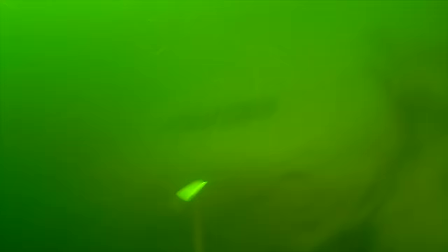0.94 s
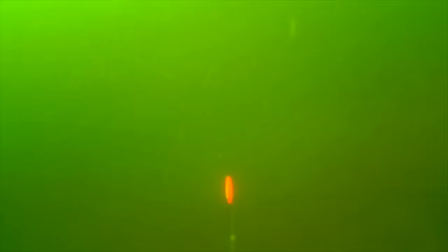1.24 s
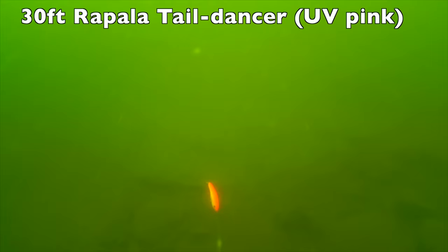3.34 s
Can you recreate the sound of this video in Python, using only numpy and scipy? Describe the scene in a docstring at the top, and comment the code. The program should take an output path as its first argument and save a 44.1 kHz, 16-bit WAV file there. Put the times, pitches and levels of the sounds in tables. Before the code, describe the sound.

A rough, swelling hum and ratcheting chatter stop suddenly, leaving soft underwater hiss, small whistling swishes and a sharp knock.

```python
"""Towed underwater camera housing

Heard from inside, on a taut line behind a fishing lure. Shed eddies make the line hum and shudder ever
harder while ratchet ticks run down it and the rig chatters; all this cuts off abruptly. Then the line sings
faintly with each swing of the rig, over hiss, a thin whine, scrapes and bumps. A sharp knock hits the case."""
import sys
import numpy as np
from scipy import signal
from scipy.fft import rfft, irfft, next_fast_len
from scipy.io import wavfile

SR = 44100
rng = np.random.default_rng(int(sys.argv[2]) if len(sys.argv) > 2 else 0)


def pcm_store(signal):
    """Save signal as 16-bit PCM."""
    levels = np.round(np.clip(np.atleast_2d(signal), -1, 1) * 32767)
    wavfile.write(sys.argv[1], SR, levels.astype(np.int16).T)


N = 306495
TIME = np.arange(N) / SR
STOP_S = 1.3165  # abrupt cut: hum, ticks and chatter break off


def amp(db):
    """dB to gain."""
    return 10 ** (np.asarray(db) / 20)


def unit(x):
    """Scale to rms 1."""
    return x / np.sqrt(np.mean(x ** 2) + 1e-20)


def add(mix, start_s, sound):
    """Mix a sound in at start_s."""
    start = round(start_s * SR)
    sound = sound[max(-start, 0):]
    part = mix[max(start, 0):][:len(sound)]
    part += sound[:len(part)]


def colour_db(colour, hz):
    """Level at hz of a spectrum of (f/Hz, level/dB) points."""
    points_hz, db = np.transpose(colour)
    return np.interp(np.log(hz + 1), np.log(points_hz), db)


def tint(x, colour):
    """Zero-phase filter with the given spectrum."""
    size = next_fast_len(len(x))
    gain = amp(colour_db(colour, np.fft.rfftfreq(size, 1 / SR)))
    return irfft(rfft(x, size) * gain, size)[:len(x)]


def ringing(colour, size):
    """Minimum-phase impulse response of a body with the given spectrum."""
    gain = amp(colour_db(colour, np.fft.rfftfreq(size, 1 / SR)))
    cepstrum = irfft(np.log(gain))
    cepstrum[1:size // 2] *= 2
    cepstrum[size // 2 + 1:] = 0
    return irfft(np.exp(rfft(cepstrum)))


def wander(t, rate_hz):
    """Random curve of rms 1, up to about rate_hz."""
    steps = rng.standard_normal(4096)
    return unit(np.interp(2 * rate_hz * t, np.arange(len(steps)), steps))


def water_wash(level_db):
    """Steady rush and hiss of the water."""
    # noise spectrum: f/Hz, relative level/dB
    colour = [(12, -43), (20, -16), (33, -6.5), (45, -15), (65, -15), (120, -18.5), (240, -19.5),
              (330, -24), (480, -26.5), (900, -24.5), (1200, -31), (1900, -31), (3400, -34), (15500, -37.5)]
    return amp(level_db) * unit(tint(rng.standard_normal(N), colour))


def line_whine(hz, width_hz):
    """Thin fading tone of the line; amplitude and phase waver."""
    # envelope: t/s, level/dB
    fade = [(0, -71), (1.3, -75), (1.9, -78), (2.3, -82), (6.95, -102)]
    level_db = np.interp(TIME, *np.transpose(fade), right=-120)
    offset_hz = np.fft.fftfreq(N, 1 / SR)
    waver = np.fft.ifft(np.exp(2j * np.pi * rng.random(N)) / (1 + (offset_hz / width_hz) ** 2))
    return amp(level_db) * unit((waver * np.exp(2j * np.pi * hz * TIME)).real)


def line_scrapes():
    """Faint patches of bright friction noise."""
    # scrapes: centre t/s, level/dB, length/s
    patches = [(1.557, -66, 0.033), (1.703, -67, 0.035), (2.046, -62.5, 0.047), (2.24, -63.5, 0.045),
               (2.851, -69, 0.47), (4.079, -66.5, 0.11), (4.251, -58, 0.04), (4.445, -71.5, 0.23),
               (5.581, -69.5, 0.094), (5.995, -66.5, 0.045), (6.215, -62, 0.032)]
    # friction spectrum: f/Hz, relative level/dB
    colour = [(2000, -46), (3500, 9), (4300, -7), (5200, 13.5), (6500, -25), (7800, 13.5), (8800, -13),
              (14000, -1.5)]
    out = np.zeros(N)
    for s, db, length_s in patches:
        size = int(length_s * SR)
        friction = unit(tint(rng.standard_normal(size), colour))
        add(out, s - length_s / 2, amp(db) * signal.windows.tukey(size) * friction)
    return out


def water_bumps(hz, decay_s):
    """Soft low pushes of the water, two or three cycles each."""
    # bumps: t/s, level/dB
    pushes = [(3.727, -45), (3.955, -47.5), (3.986, -50), (4.26, -52), (5.137, -50), (5.434, -43.5),
              (5.466, -44), (5.574, -52.5)]
    out, t = np.zeros(N), np.arange(4096) / SR
    bump = t / decay_s * np.exp(1 - t / decay_s) * np.sin(2 * np.pi * hz * t)
    for s, db in pushes:
        add(out, s, amp(db) * bump)
    return out


def eddy_tones(curves, tones, colour, hard_db, jitter, drift, flicker_db, roughness, stagger_s):
    """Eddies drive tones that glide with the flow; turbulence grows as the level nears hard_db."""
    out, sounding = np.zeros(N), curves[0] > -90
    t = TIME[sounding]
    level_db, hz, lift_db = (curve[sounding] for curve in curves)
    effort_db = np.clip(level_db - hard_db, -12, 3)
    song, power = 0, 0
    # each stretch of line meets its own eddies, so the tones swell and stray separately
    for ratio, db, growth in tones:
        treble_db = lift_db * np.clip(np.log2(ratio), 0, 1)
        tone_db = db + growth * effort_db + treble_db + flicker_db * wander(t, 20)
        strength = amp(tone_db + colour_db(colour, ratio * hz))
        stray = 1 + jitter * wander(t, 120) + drift * wander(t, 20)
        grain = 1 + .35 * wander(t, 90)
        local_s = t + stagger_s * wander(t, 6)  # a swing arrives early or late
        local_db, local_hz = np.interp(local_s, t, level_db), np.interp(local_s, t, hz)
        phase = 2 * np.pi * np.cumsum(ratio * local_hz * stray) / SR
        song += strength * grain * amp(local_db - level_db) * np.cos(phase)
        power += strength ** 2 / 2
    turbulence = roughness * amp(effort_db / 2) * unit(tint(rng.standard_normal(N), colour))[sounding]
    out[sounding] = amp(level_db) * (song / np.sqrt(power) + turbulence)
    return out


def rig_swings(faint_gap_s, faint_db):
    """Clear swings, with faint ones in the pauses: (t/s, level/dB, treble lift/dB)."""
    # clear swings: t/s, level/dB, treble lift/dB
    clear = [(1.49, -60, -2.5), (1.745, -60, -6), (2.03, -61, -6), (2.37, -57.5, -10), (2.482, -57, 3.5),
             (2.572, -44, 2), (2.65, -45.5, -11), (2.708, -41.5, -5), (2.765, -42, -4), (2.816, -42.5, -8),
             (2.864, -47, -6.5), (2.935, -46.5, -1), (3.049, -55, 0), (3.122, -47, -3), (3.197, -51, -3.5),
             (3.282, -47.5, -5.5), (3.384, -52, -8), (3.479, -45, -2), (3.553, -45, -3.5), (3.648, -56, -3),
             (3.729, -46.5, -4), (3.815, -52.5, -4), (3.93, -53.5, 3), (4.028, -50, -2.5), (4.13, -55, 4),
             (4.229, -52, -2.5), (4.349, -53, -1.5), (4.463, -54.5, 4), (4.568, -55.5, 1.5),
             (4.649, -53.5, -6), (4.779, -61.5, 8), (4.877, -55.5, 2), (4.979, -56, -2), (5.343, -59, 13.5),
             (5.39, -65, 9), (5.438, -54.5, 3.5), (5.49, -62.5, 9), (5.679, -61.5, 10),
             (5.806, -59.5, -3.5), (5.905, -55.5, -7.5), (6.037, -58, 9.5), (6.142, -60, -6),
             (6.363, -59.5, -8), (6.622, -58, -5.5), (6.747, -59.5, -6.5), (6.871, -59, -8.5)]
    clear_s = np.array([row[0] for row in clear])
    late, size, lift = rng.standard_normal((64, 3)).T
    faint_s = STOP_S + faint_gap_s * (np.arange(len(late)) + .5 + .15 * late)
    faint = [(s, db, lift_db) for s, db, lift_db in zip(faint_s, faint_db + 1.8 * size, 5 * lift)
             if abs(clear_s - s).min() > .7 * faint_gap_s and s < TIME[-1]]
    return clear + faint


def swing_flow(swings, width_s, bend, stretch):
    """Flow rises and falls with each swing. Curves of level/dB, pitch/Hz, treble lift/dB."""
    tow_hz, firm_rise_hz, firm_db, lift_hz_per_db = 773, 202.6, -46, -6
    power, weight, pitch, lift = np.full((4, N), 1e-14)
    top_db = max(row[1] for row in swings)
    t = np.arange(-6000, 6000) / SR
    for s, db, lift_db in swings:
        # harder swing: faster flow, higher and shorter whistle
        peak_hz = tow_hz + firm_rise_hz * amp(db - firm_db) ** .58 + lift_hz_per_db * lift_db
        sigma_s = width_s * amp(stretch * (top_db - db))
        swell = np.exp(-(t / sigma_s) ** 2 / 2)
        add(power, s + t[0], (amp(db) * swell) ** 2)
        add(weight, s + t[0], swell ** 2)
        add(pitch, s + t[0], swell ** 2 * peak_hz * (1 - bend * (1 - swell)))
        add(lift, s + t[0], swell ** 2 * lift_db)
    return 10 * np.log10(power), pitch / weight, lift / weight


def line_whistles():
    """At towing speed the line gives one small arched whistle per swing."""
    # eddy tones: pitch ratio, relative level/dB, growth/(dB per dB of effort)
    tones = [(.29, -8.5, -0.99), (.51, -8, 0.19), (.62, 0, 0.72), (.79, -9, -0.61), (1.021, -0.5, -0.073),
             (1.37, -6.5, 0.33), (1.68, -7.5, 0.66), (1.97, -3.5, 0.0057), (2.52, -5.5, 0.76),
             (2.929, -10.5, 0.45), (3.3, -10.5, 0.29)]
    # housing response: f/Hz, gain/dB
    housing = [(200, -22.5), (370, -18.5), (480, 3.5), (560, -5), (650, 2.5), (800, -10), (960, 5),
               (1150, -4), (1330, -6.5), (1480, 2), (1640, 6), (1850, -4.5), (2020, 3), (2250, -12.5),
               (2480, 3), (2850, -11), (3200, -5), (3550, -5.5), (3900, -15), (9000, -27)]
    swings = rig_swings(faint_gap_s=.115, faint_db=-66)
    curves = swing_flow(swings, width_s=.0122, bend=.22, stretch=.17)
    return eddy_tones(curves, tones, housing, hard_db=-46, jitter=.015, drift=.022,
                      flicker_db=3.5, roughness=.28, stagger_s=.00401)


def case_knocks(rise_s, strike_db, rebound_s, rebound_db):
    """The struck case rings, quickly damped by the water; a weak rebound follows."""
    # one sharp knock, one faint: t/s, relative level/dB
    strikes = [(5.5197, -14.5), (5.9517, -39.5)]
    # case modes: f/Hz, relative level/dB, t60/s
    modes = [(960, -31.5, 0.029), (1585, -12.5, 0.0098), (2070, 2.5, 0.0031), (3070, 2.5, 0.0042),
             (3460, -3.5, 0.0069), (4270, -15, 0.0062), (5070, 2.5, 0.0019), (6100, -16, 0.0055),
             (7920, -6, 0.0051)]
    out, t = np.zeros(N), np.arange(2048) / SR
    ring = sum((-1) ** k * amp(db - 60 * t / t60_s) * np.sin(2 * np.pi * hz * t)
               for k, (hz, db, t60_s) in enumerate(modes))
    ring *= 1 - np.exp(-(t / rise_s) ** 2)
    ring /= abs(ring).max()
    for s, db in strikes:
        add(out, s, amp(db + strike_db) * ring)
        add(out, s + rebound_s, amp(db + rebound_db) * ring)
    return out


def line_hum(shudder_hz, crest_s, throb_db, throb_bend, bend_lag_s):
    """The hard-pulled line hums low and rough; its shudder swings the hum's level and pitch."""
    # hum under pull: t/s, level/dB, pitch/Hz, treble lift/dB
    pull = [(0, -58.5, 400, -10), (.2, -54.5, 210.8, 12), (.235, -42.5, 214.6, -4), (.27, -45, 219.5, -3),
            (.345, -41.5, 270.6, 0), (.39, -52.5, 209.9, 2), (.48, -39.5, 244.8, 1), (.57, -33.5, 335.9, 1),
            (.63, -38.5, 305.6, 3), (.71, -31, 349.7, 7), (.82, -41, 280.8, 10), (.9, -37.5, 315.8, 0),
            (1.02, -30.5, 364.7, 1), (1.17, -30, 390, -4.5), (1.27, -32.5, 381.8, 2.5),
            (1.32, -36.5, 352.5, -15.5)]
    # eddy tones: pitch ratio, relative level/dB, growth/(dB per dB of effort)
    tones = [(1, 1, 0), (1.45, -11, 2), (1.97, 0.5, 0.84), (2.65, -8, -0.05), (3.7, -10, 0),
             (4.3, -8.5, 0.7), (5.2, -10, 0)]
    # housing response: f/Hz, gain/dB
    housing = [(100, -14), (220, -4), (380, -3), (560, -4), (800, 1), (1050, -2), (1230, -7), (1550, 4.5),
               (1950, -0.5), (2400, -6), (3300, -11.5), (4200, -26), (9000, -39.5)]
    full_pull_db, shudder_db, shudder_growth = -30.5, -42, 1.2
    times_s, *columns = np.transpose(pull)
    pull_db, hz, lift_db = (np.interp(TIME, times_s, column) for column in columns)
    throb = np.cos(2 * np.pi * shudder_hz * (TIME - crest_s))
    late_throb = np.cos(2 * np.pi * shudder_hz * (TIME - crest_s - bend_lag_s))
    curves = pull_db + throb_db * throb, hz * (1 + throb_bend * late_throb), lift_db
    hum = eddy_tones(curves, tones, housing, hard_db=-33, jitter=.02, drift=.015,
                     flicker_db=2.5, roughness=.55, stagger_s=.001)
    shudder = amp(shudder_db + shudder_growth * (pull_db - full_pull_db)) * throb
    return hum + shudder


def tick_runs(gap_spread, spread_db):
    """Quick runs of ratchet ticks at a roughly even pace. Yields (t/s, level/dB) per tick."""
    # buzzing runs: start/s, length/s, relative level/dB, typical gap/s
    runs = [(0.048, 0.096, -46, 0.0089), (.594, 0.31, -40, .0095), (0.9737, .34, -38, .0125)]
    for start_s, length_s, db, gap_s in runs:
        s = start_s
        for gap, size in rng.standard_normal((64, 2)):
            if s < start_s + length_s:
                yield s, db + spread_db * size
            s += gap_s * np.exp(gap_spread * gap)


def line_ticks(delay_1khz_s, ring_s, ring_db):
    """High bending waves travel faster, so each tick arrives as a falling chirp and rings the housing."""
    # clear ticks: t/s, relative level/dB
    clear = [(0.0123, -44), (0.0357, -43.5), (0.1536, -42.5), (0.1696, -42.5), (0.1878, -43.5),
             (0.2527, -40.5), (.2742, -40), (.318, -38), (0.3417, -37.5), (0.3755, -37.5), (.3843, -41),
             (.396, -38.5), (0.4085, -36.5), (.418, -38.5), (0.4329, -38), (.4574, -41), (.5031, -36),
             (.527, -37), (0.5609, -35), (.942, -39)]
    # housing response: f/Hz, gain/dB
    housing = [(700, -10), (1600, -7), (2100, -9.5), (2430, -22.5), (2750, 2), (3700, -0.5), (4150, -18),
               (4550, -4.5), (5100, -12.5), (5700, -6.5), (6500, -17), (7800, -5), (8600, -21.5),
               (9400, -14), (11200, -22), (12400, -24), (14000, -34.5)]
    out, t = np.zeros(N), np.arange(1024) / SR
    hz = np.fft.rfftfreq(len(t), 1 / SR)
    delay_s = delay_1khz_s * np.sqrt(1000 / np.maximum(hz, 400))
    dispersion = np.exp(-2j * np.pi * np.cumsum(delay_s) * hz[1])
    response = dispersion * rfft(ringing(housing, len(t)))
    impulse = unit(signal.unit_impulse(len(t)))
    for s, db in clear + list(tick_runs(gap_spread=.22, spread_db=2)):
        ring = unit(rng.standard_normal(len(t)) * np.exp(-t / ring_s))
        tick = irfft(rfft(impulse + amp(ring_db) * ring) * response)
        add(out, s - delay_s[-1], amp(db) * tick / np.linalg.norm(tick))
    return out


def rig_blows(light_count, within_s, light_db, spread_db):
    """Each hard blow comes amid lighter ones. Yields (t/s, level/dB) per blow."""
    # hard blows: t/s, relative level/dB
    hard = [(.6925, -16.5), (.699, -15.5), (.748, -15.5), (.843, -20), (.903, -25.5), (.919, -13),
            (1.083, -16.5), (1.1936, -18.5), (1.2198, -8.5), (1.2621, -11.5), (1.2702, -13), (1.294, -15.5),
            (1.3118, -17.5)]
    for s, db in hard:
        yield s, db
        for place, size in rng.uniform(-1, 1, (light_count, 2)):
            yield s + within_s * place, db + light_db + spread_db * size


def rig_chatter(ring_s, ring_db):
    """The rig hits the housing: a sharp contact and a few ms of scattered ringing per blow."""
    # blow spectrum: f/Hz, relative level/dB
    colour = [(150, -31.5), (400, -11.5), (700, -28.5), (1150, -12.5), (1450, -1.5), (1700, -8),
              (1950, 6.5), (2350, -12), (2750, -8), (3400, -10), (4100, -34), (6000, -33.5), (12000, -46.5)]
    out, t = np.zeros(N), np.arange(1024) / SR
    lead, contact_lag = 128, 26  # samples
    contact = unit(tint(signal.unit_impulse(len(t), lead + contact_lag), colour))
    for s, db in rig_blows(light_count=3, within_s=.008, light_db=-7.5, spread_db=.5):
        burst = rng.standard_normal(len(t)) * np.exp(-t / ring_s)
        ring = unit(tint(np.roll(burst, lead), colour))
        blow = rng.choice([-1, 1]) * contact + amp(ring_db) * ring
        add(out, s - lead / SR, amp(db) * blow / np.linalg.norm(blow))
    return out


def scene():
    """Loud hum, ticks and chatter, cut off abruptly, then quiet towing."""
    pull = amp(-2.66) * line_hum(shudder_hz=26.2, crest_s=1.149, throb_db=4,
                                 throb_bend=.1, bend_lag_s=.0036)
    pull += amp(24) * line_ticks(delay_1khz_s=.003596, ring_s=.001, ring_db=-1.5)
    pull += amp(17) * rig_chatter(ring_s=.0027, ring_db=5)
    tow = amp(.26) * line_whistles()
    tow += case_knocks(rise_s=.00085, strike_db=4, rebound_s=.0037, rebound_db=-17.5)
    tow += water_bumps(hz=120, decay_s=.0039) + line_scrapes()
    background = line_whine(hz=1840, width_hz=33) + water_wash(level_db=-59.5)
    return (pull * (TIME < STOP_S) + tow + background)[None]


def record(dry):
    """Band limit and DC offset of the converter."""
    cutoff_hz, dc_offset = 15950, .0045
    low_pass = signal.firwin(511, cutoff_hz, window=("kaiser", 9), fs=SR)
    return signal.oaconvolve(dry, low_pass[None], "same") + dc_offset


dry = scene()
out = record(dry)
pcm_store(out)
```